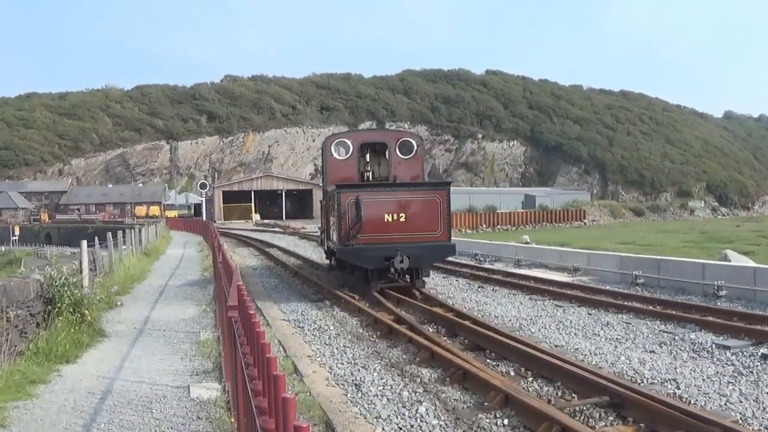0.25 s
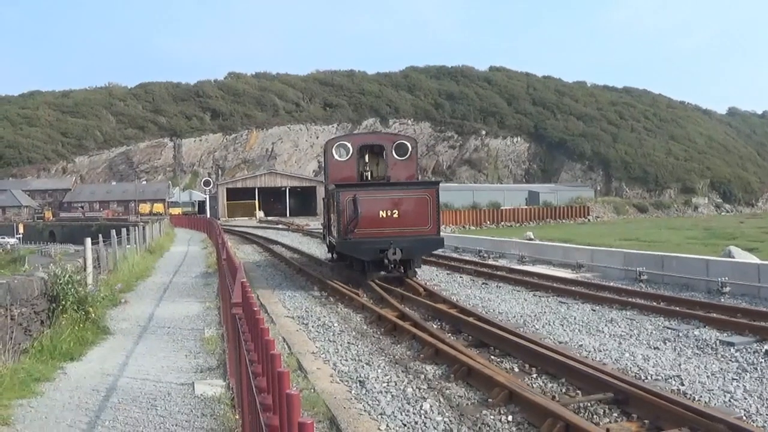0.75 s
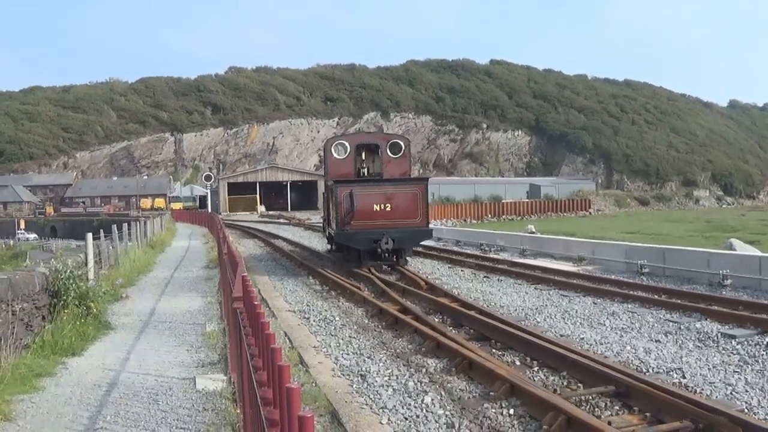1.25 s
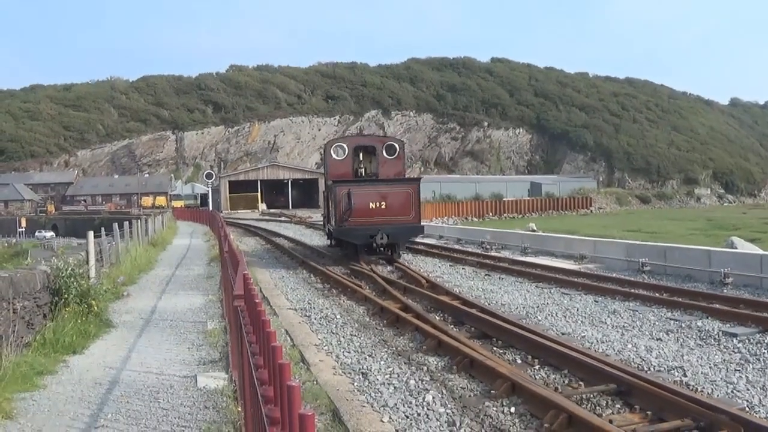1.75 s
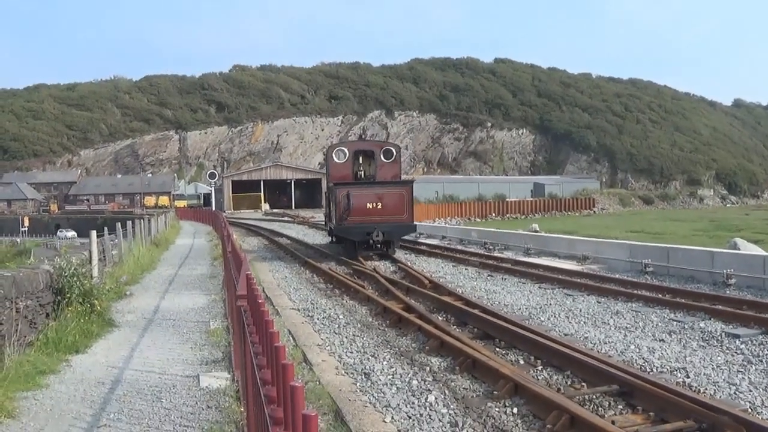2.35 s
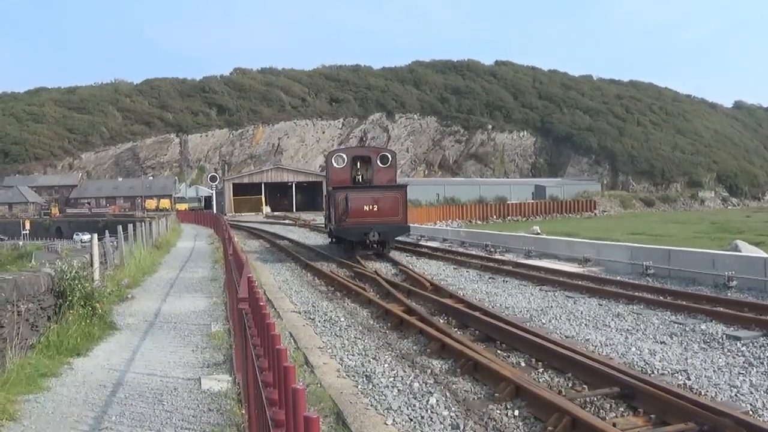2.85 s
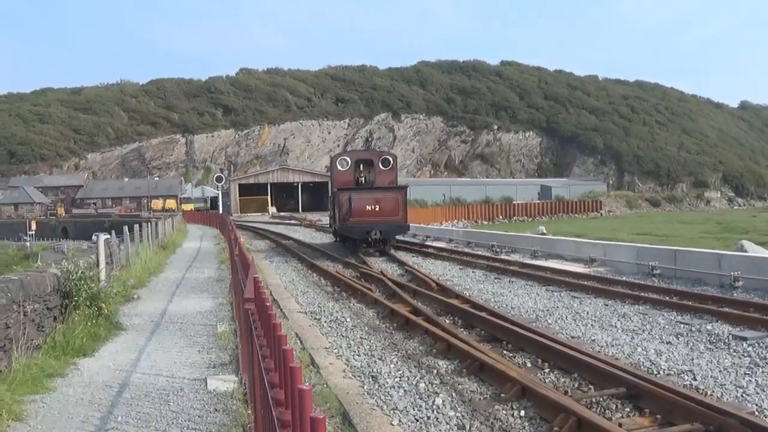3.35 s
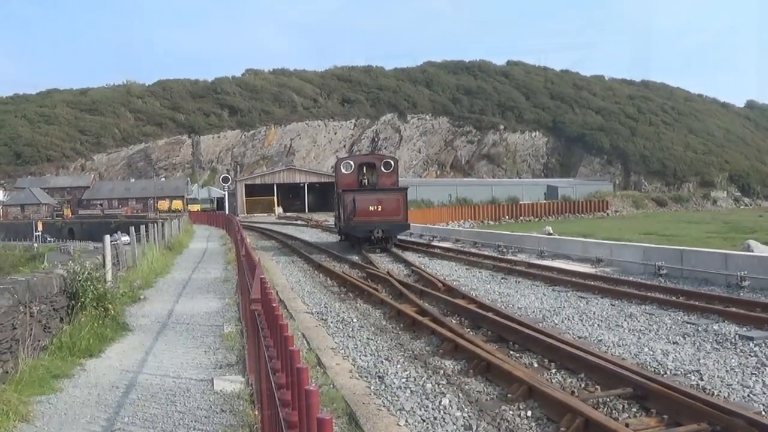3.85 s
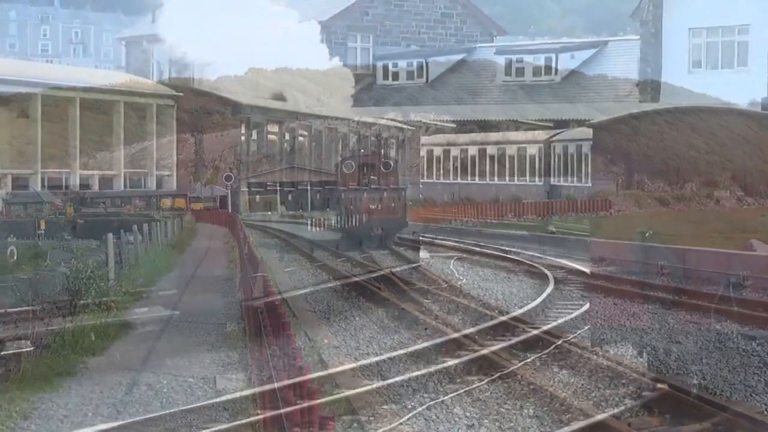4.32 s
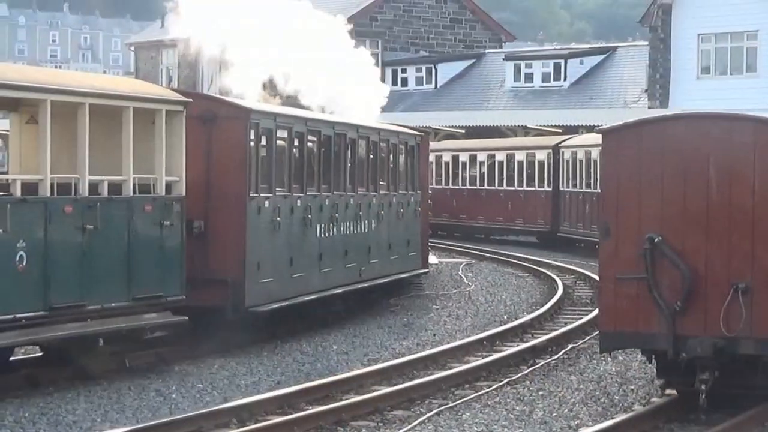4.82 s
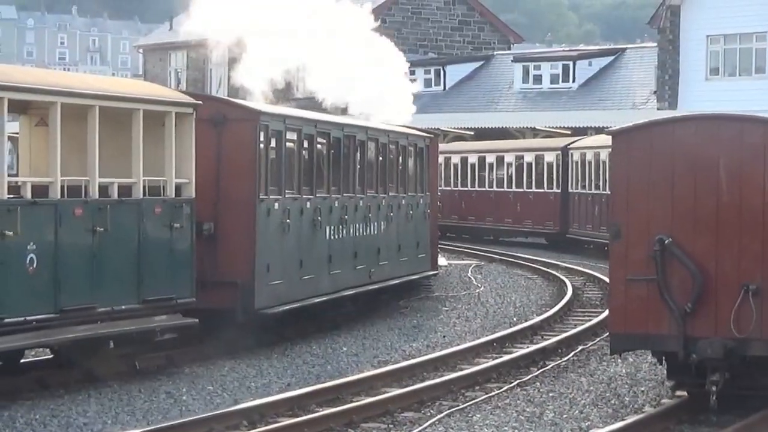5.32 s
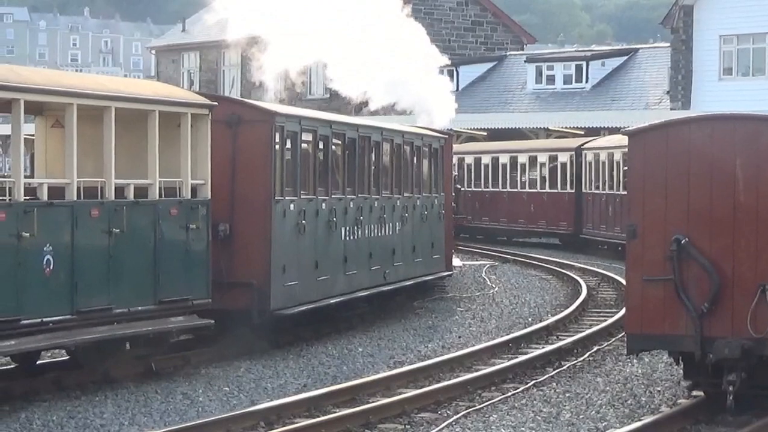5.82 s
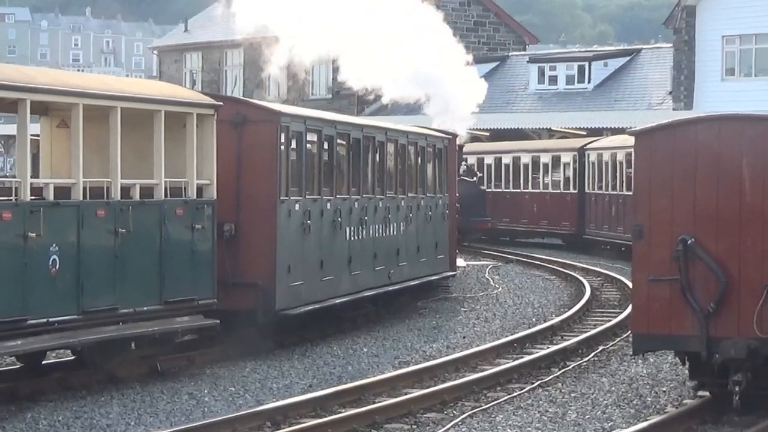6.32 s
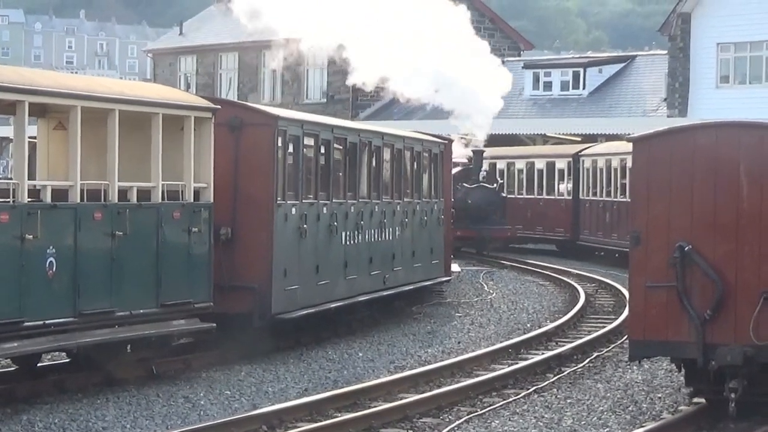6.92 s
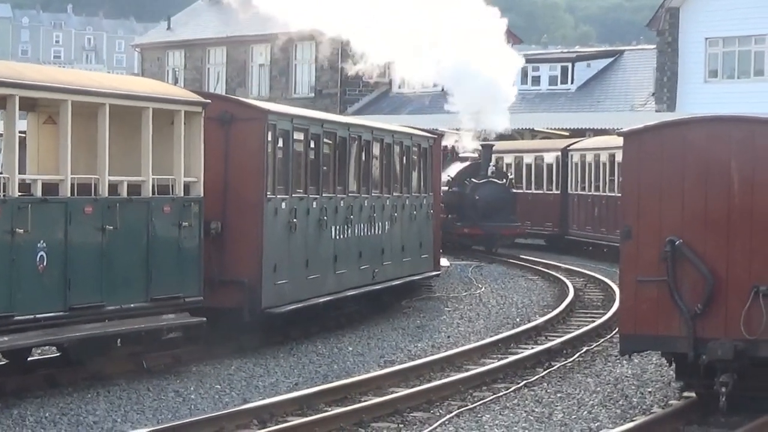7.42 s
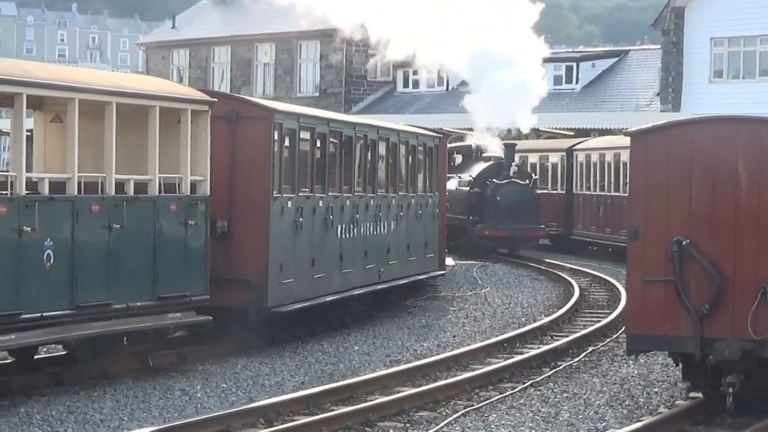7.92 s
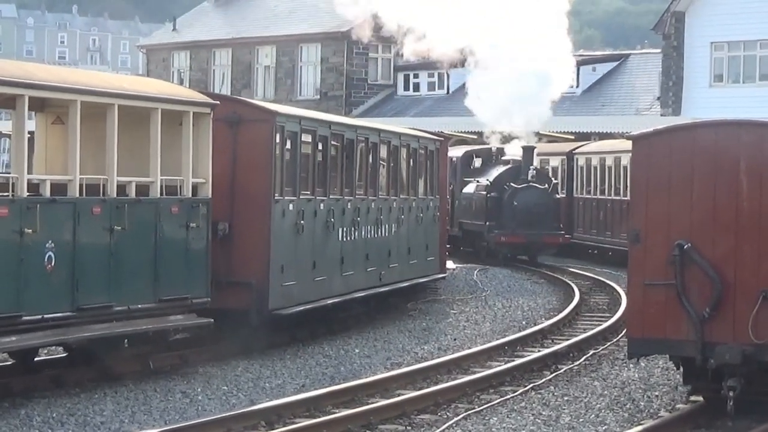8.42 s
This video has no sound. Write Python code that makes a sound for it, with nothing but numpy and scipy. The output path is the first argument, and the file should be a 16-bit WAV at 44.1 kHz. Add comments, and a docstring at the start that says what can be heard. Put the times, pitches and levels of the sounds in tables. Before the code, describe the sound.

A small steam engine rolls away outdoors, heard from beside the track. Its wheels rumble, with a cluster of thuds, ringing clanks and light rod clinks in the first second. At about 0.6 seconds one short, spitting gush of steam escapes. More metal knocks come near 1.8 and 2.4 seconds, then fainter ones up to 3.9, while grit ticks and crackles under the wheels. From about 4 seconds the sound dissolves into a station, the rolling gone shortly after 5. There a second engine blows off wet steam, a louder, continuous sputtering roar and hiss with a breathy, slightly wavering whistle inside it. Coaches rumble softly underneath, with a few dull bumps between 4.4 and 5.5 seconds. Brief whistling tones swell and fade in the steam, and from about 7 seconds the hiss grows brighter and stronger, lasting until the end at around 8.6 seconds.

```python
"""A small steam engine rolls away over points. Rough treads set wheels and frame rumbling, impacts at
the rail gaps ring the ironwork, grit fractures, rods clink, and early on one gush of steam escapes.
From about four seconds the scene dissolves to a station, where coaches rumble and bump and a second
engine blows off wet steam. Its turbulent jet excites the valve casing: a sputtering roar and a breathy
whistle, under a hiss that brightens as the engine creeps out from behind the coaches."""
import sys
import numpy as np
from scipy import signal
from scipy.fft import rfft, irfft, next_fast_len
from scipy.io import wavfile
from scipy.ndimage import uniform_filter1d, map_coordinates

SR = 44100
rng = np.random.default_rng(int(sys.argv[2]) if len(sys.argv) > 2 else 0)


def output_pcm(signal):
    """Save a mono or channel-first signal as 16-bit PCM at the path in sys.argv[1].

    Samples are clipped to [-1, 1] before scaling.
    """
    pcm = np.clip(np.atleast_2d(signal).T, -1, 1) * 32767
    wavfile.write(sys.argv[1], SR, np.round(pcm).astype(np.int16))


N = 382347
TIME = np.arange(N) / SR
FREQ = np.maximum(np.arange(N // 2 + 1) * SR / N, 1)
START_M, SPEED_M_S = 7.7, 2.97  # the receding engine
DISTANCE_RATIO = 1 + SPEED_M_S * TIME / START_M
STATION_FADE_S, LINE_FADE_S = (3.855, 4.42), (4.8, 5.25)

# Wheel and coupling impacts. Each row: peak time in seconds, levels of thud, frame note, clank and ring
# in dB, centre of the ring in Hz, rise in seconds.
KNOCKS = [(.025, -46.5, -55, -34.5, -56, 1630, 0.05), (.146, -31, -36, -36, -30, 805, 0.0008),
          (0.174, -29, -42, -35, -35, 700, .009), (.258, -36, -46, -41, -43, 700, .002),
          (.36, -35, -42, -34.5, -40, 720, 0.017), (.455, -30.5, -35, -40, -27, 700, .0007),
          (.53, -40, -52, -27, -50, 1500, 0.024), (.615, -44, -50, -31, -50, 1500, 0.018),
          (.73, -36.5, -41, -34, -46, 700, 0.02), (.9, -56, -58, -41, -57, 1500, 0.026),
          (1.215, -56, -60, -38.5, -45, 1500, .008), (1.251, -52, -55, -46, -45, 1400, .001),
          (1.37, -37, -49, -48, -55, 700, .006), (1.688, -41, -49, -43, -42, 1700, 0.015),
          (1.769, -48, -52, -44, -43, 1400, .001), (1.802, -32.5, -30, -27, -29.5, 3300, 0.016),
          (1.897, -36, -46, -55, -55, 700, .004), (2.306, -29.5, -23.5, -61, -60, 700, .016),
          (2.346, -40, -46, -36, -40, 1450, .008), (2.373, -36, -28, -25, -25, 860, 0.008),
          (2.385, -46, -46, -36, -40, 1900, .003), (2.445, -32, -34, -58, -58, 3000, .007),
          (2.465, -38, -40, -58, -55, 3000, .005), (2.86, -39, -42, -57, -62, 700, 0.0089),
          (3.195, -53, -60, -42, -47, 2600, .015), (3.462, -53, -60, -41, -44, 2300, .003),
          (3.838, -40, -50, -35.5, -44, 1900, 0.0094), (3.87, -39, -48, -42, -37, 800, 0.0028)]


def undb(db):
    """Amplitude ratio of a level in decibels."""
    return 10 ** (np.asarray(db) / 20)


def unit(x):
    """Normalisation to an rms of 1."""
    return x / np.sqrt(np.mean(x ** 2))


def colour(points, modes=()):
    """Frequency response: a broad slope through (Hz, dB) points, plus (Hz, width in Hz, dB) resonances."""
    hz, db = np.transpose(points)
    grid = FREQ[::20]
    slope = np.interp(np.log(grid), np.log(hz), db)
    peaks = sum(d * .5 ** np.minimum((2 * (grid - f) / w) ** 2, 20) for f, w, d in modes)
    return np.interp(FREQ, grid, undb(slope + peaks))


def shape(x, gain):
    """Filtering by multiplication of the spectrum."""
    size = next_fast_len(N, True)
    response = np.interp(np.arange(size // 2 + 1) * SR / size, FREQ, gain)
    return irfft(rfft(x, size) * response, size)[..., :N]


def noise(side_db):
    """Partly coherent stereo noise: a common part and a weaker antiphase part."""
    mid, side = rng.standard_normal((2, N))
    return np.array([mid + undb(side_db) * side, mid - undb(side_db) * side])


def walk(rate):
    """Smooth random modulation with a spread near 1 and `rate` new values a second."""
    hold = max(int(SR / rate), 1)
    steps = np.repeat(rng.standard_normal(N // hold + 1), hold)
    return 1.3 * uniform_filter1d(uniform_filter1d(steps, hold), hold)[:N]


def grains(per_s, spread_db):
    """Shot noise: impulses at random moments, a few much larger than the rest."""
    impulses = (rng.random(N) < per_s / SR) * rng.choice([-1, 1], N)
    return unit(impulses * undb(spread_db * np.minimum(rng.exponential(size=N), 4)))


def hump(s, half_s):
    """Gaussian envelope: 1 at s, one half at half_s to either side."""
    return np.exp2(-np.minimum(((TIME - s) / half_s) ** 2, 20))


def burst(s, rise_s, decay_s):
    """Exponential growth to a peak at s, then exponential decay."""
    swell = np.zeros(N)
    near = slice(max(int((s - 10 * rise_s) * SR), 0), int((s + 10 * decay_s) * SR))
    swell[near] = np.exp(-np.maximum((s - TIME[near]) / rise_s, (TIME[near] - s) / decay_s))
    return swell


def struck(s, modes):
    """Impulse response of metal hit at s: a sum of damped sinusoids."""
    ring = np.zeros(N)
    near = slice(int(s * SR), int((s + .25) * SR))
    age = TIME[near] - TIME[near][0]
    ring[near] = sum(undb(db) * np.sin(2 * np.pi * hz * age) * np.exp(-age / decay)
                     for hz, db, decay in modes)
    return ring


def breathy(hz, width_hz, wander=0):
    """Band-limited oscillation: turbulence scatters the phase while the amplitude saturates."""
    phase = 2 * np.pi * np.cumsum(hz * (1 + wander * walk(5))) / SR if wander else 2 * np.pi * hz * TIME
    a, b = walk(2 * width_hz), walk(2 * width_hz)
    return unit((a * np.cos(phase) + b * np.sin(phase)) / np.sqrt(2 + a * a + b * b))


def rolling():
    """Roughness excitation: the treads shake wheels, rails and frame, fainter with distance."""
    # Spectra of wheels, frame and treads. Each row: frequency in Hz, gain in dB.
    wheel_colour = [(40, -38), (120, -29), (200, 2), (305, 0.5), (480, -6), (800, 0.5), (1050, -3.5),
                    (1300, -11.5), (1650, -10), (2100, -23.5), (4000, -34.5)]
    frame_colour = [(25, -28.5), (45, -15), (75, -8), (130, -1), (200, -3.5), (300, -6), (500, -8.5),
                    (1500, -46.5)]
    tread_colour = [(700, -7.5), (1600, 2), (2100, -3), (3500, -3.5), (5000, -9.5), (6100, -7), (7400, -17),
                    (9500, -8.5), (11000, -21)]
    # Tread resonances. Each row: frequency in Hz, width in Hz, gain in dB.
    tread_modes = [(1556, 77, 12), (1860, 60, 14), (2330, 160, 11), (2780, 140, 2), (3080, 260, 7.5),
                   (3850, 400, 5), (4190, 160, 5), (8160, 300, 3)]
    # Rough track and points. Each row: time and half length in seconds, roar, rumble and hiss gains in dB.
    rough_track = [(.3, 0.35, 3.5, 1.5, 1.5), (0.69, 0.16, 0, 5, -2), (2.038, 0.17, 0.5, 9, -1),
                   (2.504, 0.24, 2, 8, 1), (3.1, 0.17, 1.5, 0, 2), (4.086, 0.53, 7.5, 2, 7)]
    far_db = -20 * np.log10(DISTANCE_RATIO)
    roar_db = -38 + far_db + sum(db * hump(s, half) for s, half, db, _, _ in rough_track)
    # The rails carry rumble and hiss back, so these take only a share of the spreading loss.
    rumble_db = -50 + .11 * far_db + sum(db * hump(s, half) for s, half, _, db, _ in rough_track)
    tread_db = -50 + .78 * far_db + sum(db * hump(s, half) for s, half, _, _, db in rough_track)
    wheels = unit(shape(noise(side_db=-12.5) + .29 * grains(per_s=250, spread_db=2), colour(wheel_colour)))
    frame = unit(shape(noise(side_db=-13), colour(frame_colour)))
    contact = noise(side_db=-6) + .54 * grains(per_s=900, spread_db=2)
    free = .5 + .5 * np.tanh(walk(12))  # the wheels ring only while the flanges run free
    ringing = shape(contact, colour(tread_colour, tread_modes))
    damped = shape(contact, colour(tread_colour))
    tread = unit(free * ringing + (1 - free) * damped) * undb(tread_db + 2.4 * walk(24))
    return wheels * undb(roar_db + 1.23 * walk(18)) + frame * undb(rumble_db + 1.5 * walk(20)) + tread


def crackle():
    """Patches of sand fracture under the treads; the pressure falls inversely with distance."""
    response = colour([(500, -14), (2000, 5), (4000, 0), (6500, -9), (9500, -2), (11000, -3)])
    sand = unit(shape(grains(per_s=90, spread_db=5.5), response))
    return sand * undb(-56 + 3.1 * walk(8.3)) / DISTANCE_RATIO


def blow(s, rise_s):
    """Impact envelope: a blow that builds slowly also decays slowly."""
    return burst(s, rise_s, decay_s=.0098 + .74 * rise_s)


def knocks():
    """Impact excitation: a wheel drops into a gap, the frame thuds and rattling contacts clank."""
    # Spectra of thud and clank. Each row: frequency in Hz, gain in dB.
    thud_colour = [(40, -26), (100, -25), (200, 11.5), (310, 7.5), (420, 2), (600, -10), (1500, -57),
                   (5000, -70)]
    clank_colour = [(40, -40), (150, -15), (400, -2), (750, 10.5), (1100, 1), (1500, 3), (2100, -7),
                    (3500, -9), (5500, -18), (11000, -23.5)]
    # Resonances of wheel and frame. Each row: frequency in Hz, width in Hz, gain in dB.
    wheel_modes = [(630, 50, 4), (780, 50, -1), (945, 110, 5), (1490, 51, 4.5), (1630, 60, -6),
                   (1900, 80, -3), (2600, 71, 2), (3170, 27, 7)]
    thud = sum(undb(db) * blow(s, rise) for s, db, *_, rise in KNOCKS)
    clank = sum(undb(db) * blow(s, rise) for s, _, _, db, *_, rise in KNOCKS)
    frame = unit(shape(noise(side_db=-10), colour(thud_colour)))
    rattle = noise(side_db=-7.5) + grains(per_s=1400, spread_db=-1)
    iron = unit(shape(rattle, colour(clank_colour, wheel_modes)))
    return thud * frame + clank * iron


def mode_coupling(hz, centre_hz):
    """Selective excitation: a blow drives most strongly the modes near its centre frequency."""
    spread_octaves = .28
    return np.exp(-abs(np.log2(hz / centre_hz)) / spread_octaves)


def rings():
    """Modal vibration: each blow leaves frame and ironwork ringing, phase-modulated by the rattle."""
    # Modes of the ironwork. Each row: frequency in Hz, relative level in dB, decay in seconds.
    iron_modes = [(631.5, 2.5, 0.014), (731, -2.5, 0.0092), (920, -2, 0.01), (1485, 4, 0.0092),
                  (1700, -8, .012), (1885, 0, 0.015), (2690, -1, .007), (3020, -6, 0.0087),
                  (3270, -9, .006), (3500, -6, .009), (3610, 0, .01), (3675, 1, 0.02), (4500, -8, .014)]
    frame_hz, contact_db = 330, -1.5
    waver = walk(220)
    frame_envelope = sum(undb(db) * burst(s, rise, decay_s=.0055) for s, _, db, *_, rise in KNOCKS)
    frame = np.sin(2 * np.pi * frame_hz * TIME + .5 * walk(70)) * frame_envelope
    iron = contact = 0
    for hz, mode_db, decay in iron_modes:
        envelope = 0
        for s, *_, db, centre, rise in KNOCKS:
            drive = undb(db + mode_db) * mode_coupling(hz, centre)
            envelope += drive * burst(s, .53 * rise, decay)
            contact += drive * struck(s, [(hz, contact_db, decay)])  # the hard landing
        iron += np.sin(2 * np.pi * hz * TIME + waver) * envelope
    return frame + iron + contact


def grit():
    """Brittle fracture: each stone cracks with a sharp tick, then crumbles in a short spray."""
    # Stones under the wheels. Each row: start in seconds, crack level in dB, crumble level in dB.
    stones = [(0.029, -25.5, -40.5), (.0711, -35, -49), (.3314, -43, -49), (.7805, -49, -39.5),
              (.9453, -47, -50), (1.212, -37, -57), (1.249, -40, -53), (1.264, -43, -50), (1.488, -37, -66),
              (1.5203, -36, -47), (1.795, -34, -45), (2.1888, -43, -51), (2.2327, -38, -56),
              (2.352, -32, -42), (2.813, -36, -50), (2.9157, -41, -48), (3.1792, -46, -54),
              (3.2613, -38, -57), (3.2685, -37, -62), (3.4227, -33, -58), (3.431, -33, -60),
              (3.4515, -42, -51), (3.4602, -29, -49), (3.4902, -33, -49), (3.5574, -43, -51),
              (3.581, -36, -48), (3.664, -33, -43.5), (3.762, -48, -45.5), (3.806, -37, -56),
              (3.8291, -36, -56), (3.8372, -31, -52)]
    crack = sum(undb(db) * burst(s + .002, rise_s=.0002, decay_s=.0011) for s, db, _ in stones)
    crumble = sum(undb(db) * burst(s + .0038, rise_s=.0051, decay_s=.029) for s, _, db in stones)
    tick_gain = colour([(500, -8), (1400, 6), (2200, 14), (3500, 9), (6000, 0), (9000, 6.5), (11000, 6)])
    spray_gain = colour([(500, 2), (1800, 14.5), (3500, 11), (6000, 7), (10000, 10.5), (11000, -6)])
    tick = unit(shape(noise(side_db=-11), tick_gain))
    spray = unit(shape(noise(side_db=-3) + 2.8 * grains(per_s=1300, spread_db=1.5), spray_gain))
    return tick * crack + spray * crumble


def rods():
    """Free vibration: the coupling rods clink as their slack is taken up."""
    # Clinks. Each row: start in seconds, level in dB.
    clinks = [(.16, -38), (.168, -33.5), (.196, -41), (.328, -46), (3.19, -49), (3.452, -46), (3.83, -46)]
    # Modes of a rod. Each row: frequency in Hz, relative level in dB, decay in seconds.
    rod_modes = [(1684, 4, 0.0076), (2692, -3, 0.015), (3250, -8.5, 0.012), (3830, -12, .01),
                 (4190, -9, .011)]
    return sum(undb(db) * struck(s, rod_modes) for s, db in clinks)


def gush():
    """Jet noise: a spitting gush of wet steam opens, weakens as the pressure drops, and shuts."""
    # Spectrum of the jet. Each row: frequency in Hz, gain in dB.
    gush_colour = [(60, -35), (300, -3), (800, 5.5), (1500, 1.5), (2300, -1), (3500, -2), (5000, -8.5),
                   (9500, -5.5), (11000, -8)]
    open_s, attack_s, hold_s, release_s = .561, .012, .16, .065
    level_db, sag_db_per_s = -29, 43
    jet = unit(shape(noise(side_db=-7.5) + .91 * grains(per_s=1400, spread_db=3), colour(gush_colour)))
    age = TIME - open_s
    opening = np.exp(np.minimum(age, 0) / attack_s - np.clip(age - hold_s, 0, 1) / release_s)
    return jet * opening * undb(level_db - sag_db_per_s * np.clip(age, 0, hold_s) + 1.7 * walk(121.2))


def reflections(x, strength, count):
    """Comb filtering: paths off boiler and coaches shift as the hot plume sways, so the hiss swirls."""
    sway_s = .00013
    lags_s = np.geomspace(.001, .016, count) * rng.uniform(.8, 1.25, count)
    total = x
    for lag_s in lags_s:
        late = TIME - lag_s - sway_s * walk(2.2)
        total = total + strength * walk(4) * np.array([np.interp(late, TIME, channel) for channel in x])
    return total


def drift(x, depth, rate):
    """Thermal detuning: all resonances rise and fall together as the steam's heat wanders."""
    place = np.arange(N) + np.cumsum(depth * walk(rate))
    return np.array([map_coordinates(channel, [place], order=3, mode="mirror") for channel in x])


def blow_off():
    """Forced resonance: a sputtering jet drives the valve casing; the coaches shadow its treble."""
    # Spectrum of the jet. Each row: frequency in Hz, gain in dB.
    steam_colour = [(100, -30.7), (230, -17.3), (300, -14), (370, -10.5), (480, -11.7), (700, -9.6),
                    (1000, -5.3), (1500, 0.0), (2400, -2.2), (4000, -2.4), (6000, -8.7), (8200, -4.5),
                    (10000, -6.4), (11000, -9)]
    # Casing resonances. Each row: frequency and width in Hz, gains in dB when hidden and when in view.
    valve_modes = [(368, 32, 2, 3.5), (465, 70, -3.5, -1), (580, 66, 4, 5), (670, 60, -2, -2),
                   (855, 50, 4.5, 7), (922, 48, 7, 6), (1057, 50, 6.3, 6.3), (1197, 66, 8.2, 7.3),
                   (1275, 80, 8.3, 10), (1338, 66, 11.5, 11.5), (1392, 35, 6, 7), (1473, 40, 6, 8),
                   (1680, 120, 3.7, 5.4), (1800, 40, -4, 0), (1915, 160, 7.6, 5.9), (2125, 80, 6.5, 3.7),
                   (2325, 50, 3.5, 2), (2455, 120, 2.8, 7.9), (2611, 123, 5.0, 7.4), (2960, 90, 2, 2),
                   (3200, 150, 0.8, 4.6), (3420, 107, 2.5, 5.6), (3729, 124, -0.4, 3.7),
                   (4057, 150, 2.3, 4), (4331, 213, -2, -2), (4686, 240, 2.7, 2.4), (4970, 125, 3.2, 6.9),
                   (5199, 220, 4.7, 5.3), (5671, 115, 5.4, 7.5), (5873, 173, 3.2, 10.3),
                   (6320, 333, 4.5, 5.8), (6784, 254, -3.2, -5.5), (8870, 200, 2.5, 1),
                   (10106, 110, 5.3, 3.8)]
    # The valve's clearance of the coaches. Each row: time in seconds, share in view from 0 to 1.
    in_view = [(4.2, 0.07), (4.6, 0.17), (5.5, 0.25), (5.97, 0.43), (6.45, 0.34), (7.08, 0.52),
               (7.58, 0.85), (8.6, 0.76)]
    # Dry steam lifts the roar, water chokes it. Each row: time and half length in seconds, gain in dB.
    surges = [(4.1, 0.12, -2), (4.45, 0.1, -2.5), (4.667, 0.014, -12), (4.797, 0.18, 1), (4.972, 0.017, -5),
              (5.175, 0.042, 1), (5.62, 0.15, 1.5), (6.342, 0.37, -2), (7.29, 0.52, 1), (7.503, 0.015, -4),
              (8.27, 0.38, 1.5), (8.56, 0.028, -13)]
    view = np.interp(TIME, *np.transpose(in_view))
    body_db, roar_db = -41.5, -31
    rush_db = -30.3 + np.interp(TIME, (7.2, 8.5), [0, 2.5])  # grows as the engine rounds the bend
    hiss_db = -33.5 + 11 * view
    droplets = .21 * grains(per_s=700, spread_db=5)
    jet = reflections(noise(side_db=-9) + droplets, strength=.15, count=8)
    hidden = shape(jet, colour(steam_colour, [(f, w, db) for f, w, db, _ in valve_modes]))
    exposed = shape(jet, colour(steam_colour, [(f, w, db) for f, w, _, db in valve_modes]))
    steam = drift((1 - view) * hidden + view * exposed, depth=.004, rate=4)
    lowpasses = [1 / (1 + (FREQ / hz) ** 30) for hz in (1030, 1530, 4500)]
    bands = [upper - lower for lower, upper in zip([0] + lowpasses, lowpasses + [1])]
    body, roar, rush, hiss = (unit(shape(steam, band)) for band in bands)
    hiss = unit(hiss + .19 * hiss[::-1])  # the treble comes more directly, so its image is narrower
    sputter = walk(55)
    surge_db = sum(db * hump(s, half) for s, half, db in surges)
    low = body * undb(body_db + .5 * sputter + .16 * surge_db)
    low += roar * undb(roar_db + .25 * sputter + surge_db)
    high = rush * undb(rush_db + .96 * sputter) + hiss * undb(hiss_db + .94 * walk(30))
    high += edge_tones(swell_db=7, rate=8) * undb((rush_db + hiss_db) / 2 + .7 * surge_db - 2)
    low += whistle() * undb(-36 + 1.7 * surge_db)
    leftward = np.array([[1], [-1]])
    return low * undb(.16 * leftward) + (high + flares()) * undb(-.65 * leftward)


def edge_tones(swell_db, rate):
    """Edge tones: the jet oscillates at the valve lip, each note swelling and sliding by itself."""
    # Notes of the lip. Each row: frequency in Hz, width in Hz, relative level in dB.
    tones = [(1900, 60, -16.5), (2430, 45, -18), (2620, 32, -17.5), (3246, 25, -22), (3440, 45, -18),
             (3777, 25, -22), (4035, 50, -20), (4955, 60, -20.5), (5220, 90, -21.5), (5690, 60, -20.5),
             (5870, 70, -20), (6360, 90, -20), (7840, 70, -23), (8150, 90, -22), (10110, 70, -21)]
    return sum(undb(db + swell_db * np.tanh(walk(rate))) * breathy(hz, width, wander=.005)
               for hz, width, db in tones)


def whistle():
    """Flow-driven oscillation: the valve's main note slides with the pressure."""
    # Course of the note. Each row: time in seconds, frequency in Hz.
    pitch = [(4.4, 1262), (4.9, 1246), (5.55, 1264), (6.4, 1256), (7.0, 1280), (7.6, 1272), (8.1, 1281),
             (8.6, 1286)]
    return breathy(np.interp(TIME, *np.transpose(pitch)), width_hz=13, wander=.004)


def yard():
    """Damped low vibration: the rumble of settling stock decays to a floor, with a few dull bumps."""
    # Bumps of the coaches. Each row: peak time in seconds, level in dB.
    coach_bumps = [(4.42, -47), (4.78, -44.5), (5.17, -69), (5.46, -49)]
    start_db, settle_s, floor_db = -49, .82, -67.5
    response = colour([(25, -27), (50, -4), (90, 5), (180, 5.5), (280, 1), (420, -23), (1200, -36)])
    rumble = unit(shape(noise(side_db=-11), response))
    settling = undb(start_db) * np.exp(-np.maximum(TIME - STATION_FADE_S[0], 0) / settle_s)
    bumps = sum(undb(db) * burst(s, rise_s=.053, decay_s=.05) for s, db in coach_bumps)
    return rumble * (settling + bumps + undb(floor_db + 2.5 * walk(11)))


def flares():
    """Modulated noise bands: brief whistling notes and broad swells of hiss rise from the steam and fade."""
    # Each row: peak time and half length in seconds, frequency and width in Hz, level in dB.
    flare_rows = [(4.65, 0.24, 2433, 90, -36), (4.88, 0.18, 1950, 150, -36.5), (4.8, 0.2, 3900, 350, -43),
                  (4.872, 0.045, 1330, 25, -38), (5.2, 0.18, 2135, 50, -41), (5.55, 0.18, 1907, 50, -36),
                  (5.55, 0.12, 2540, 44, -41), (5.65, 0.21, 905, 40, -43), (5.75, 0.23, 1335, 27, -36.5),
                  (6.08, 0.21, 8700, 1900, -37), (6.25, .3, 5680, 45, -45), (6.632, 0.08, 730, 20, -45),
                  (6.906, 0.2, 1066, 30, -40), (7.304, 0.13, 1303, 22, -33.5), (7.45, 0.13, 4940, 98, -46),
                  (7.547, 0.36, 8870, 2200, -32), (7.9, 0.32, 1480, 17, -43), (8.1, 0.28, 3777, 40, -37),
                  (8.093, .05, 1281, 16, -31), (8.15, 0.32, 3415, 160, -35.5), (8.25, .06, 4000, 1900, -33),
                  (8.61, .1, 9400, 980, -34)]
    return sum(undb(db) * hump(s, half) * breathy(hz, width) for s, half, hz, width, db in flare_rows)


def scene():
    """Superposition: the line side dissolves into the station."""
    line_side = rolling() + knocks() + rings() + rods() + grit() + crackle() + gush()
    station = blow_off() + yard()
    leaving = np.interp(TIME, LINE_FADE_S, [1, 0])
    arriving = np.interp(TIME, STATION_FADE_S, [0, 1])
    return leaving * line_side + arriving * station


def record(dry):
    """Band limiting: a gentle high-pass sheds the deepest bass and a steep low-pass cuts the top."""
    bottom_hz, top_hz = 35, 11050
    lean = signal.sosfilt(signal.butter(2, bottom_hz, "high", fs=SR, output="sos"), dry)
    return signal.sosfilt(signal.ellip(12, .2, 70, top_hz, fs=SR, output="sos"), lean)


dry = scene()
out = record(dry)
output_pcm(out)
```